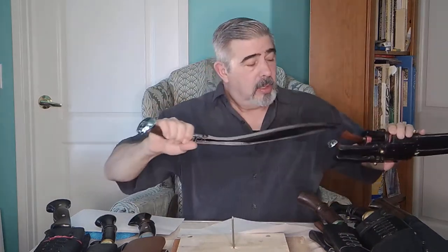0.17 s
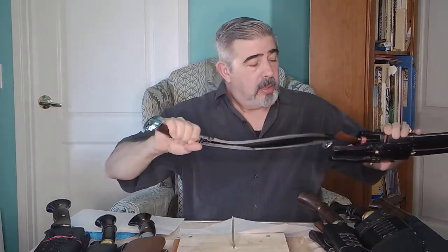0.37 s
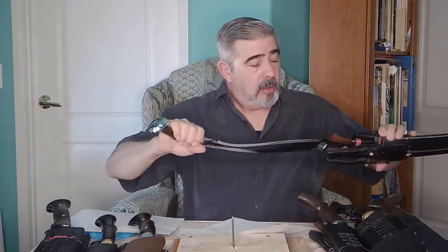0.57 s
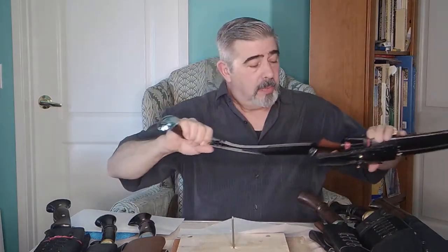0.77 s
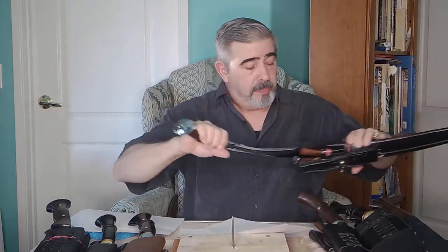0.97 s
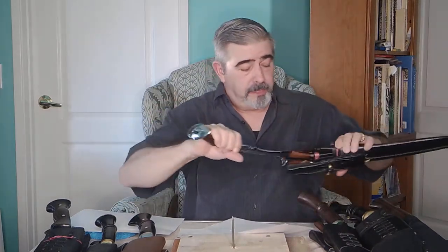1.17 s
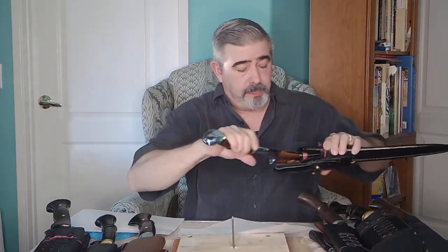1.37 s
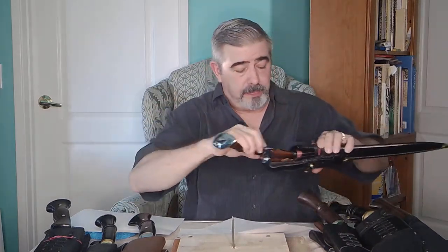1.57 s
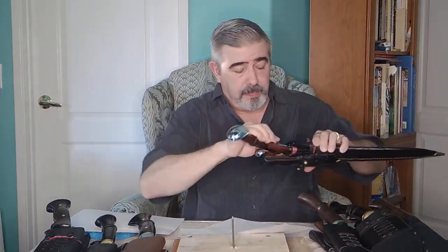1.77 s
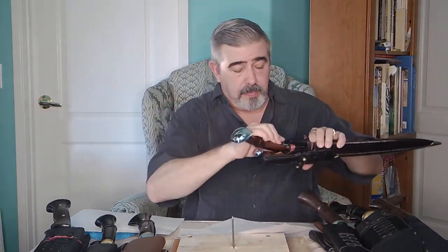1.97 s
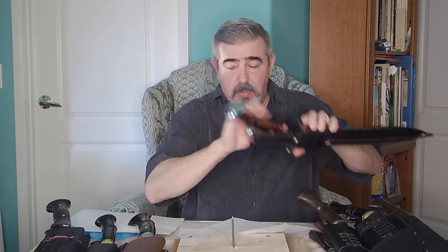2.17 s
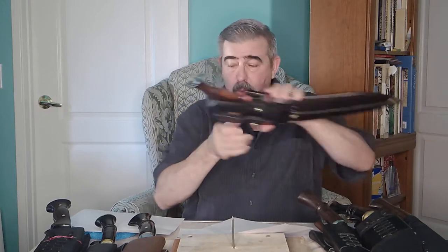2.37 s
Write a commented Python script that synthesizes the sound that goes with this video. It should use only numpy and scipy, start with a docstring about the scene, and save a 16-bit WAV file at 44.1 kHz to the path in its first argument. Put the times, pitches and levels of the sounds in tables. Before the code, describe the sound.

A blade taps and rubs into a stiff sheath, then clacks home twice indoors.

```python
"""A long curved knife is fed into its stiff scabbard in a small, lively room.
The tip taps the mouth a few times, the blade rubs along the lining in tiny slips, then knocks home
in two loud clacks that ring the sheath. A last tick and a short scrape follow as it is lifted.
A steady hiss lies underneath; the microphone favours 1-3 kHz and has two dips in the treble."""
import sys
import numpy as np
from scipy import signal
from scipy.fft import rfft, irfft, next_fast_len
from scipy.io import wavfile
from scipy.ndimage import uniform_filter1d, minimum_filter1d

SR = 44100
rng = np.random.default_rng(int(sys.argv[2]) if len(sys.argv) > 2 else 0)


def digitize_waveform(pressure):
    """Quantize a signal to 16-bit integers and store it at the path in sys.argv[1].

    Rows of a 2-D input are taken as channels; values are limited to [-1, 1].
    """
    field = np.atleast_2d(pressure).T
    bounded = np.clip(field, -1, 1)
    quanta = np.round(bounded * 32767).astype(np.int16)
    wavfile.write(sys.argv[1], SR, quanta)


N = 106986

# The EQ all knocks share. Each row: frequency in Hz, gain in dB.
KNOCK_EQ = [(60, -55), (170, -27), (330, -26.5), (500, -16.5), (760, -15), (920, -4.5), (1080, -6.5),
            (1400, 1), (1850, -1), (2250, -0.5), (2850, -3), (3400, -9), (4000, -21), (4800, -26.5),
            (5500, -32.5), (7200, -36.5), (9000, -44.5), (13000, -64), (15500, -77)]
# The blade hitting the scabbard. Each row: start in seconds, level in dB before the limiter, crunch
# length in seconds, then thud, body, edge and sparkle EQ in dB, then sheath ring trim, room send and
# steel snap in dB, and last the hollow note of the struck spot in Hz.
BLADE_HITS = [ (0.5256, -45.5, 0.0049, -6, 2, -8, -1, -5.5, 4, -58, 1400),
              (0.531, -46.5, 0.0023, 4, 4, 15, 10, -11, 4, -46, 1610),
              (0.725, -38, 0.0061, 6, 2, -4.5, 1, -4.5, 0.5, -52, 1630),
              (0.7495, -46, 0.0025, 13.5, 14.5, 5, 19, -11, -0.5, -38, 1570),
              (0.8826, -37.5, 0.0032, 2, 2.5, -8, -8, -0.5, 0.5, -52, 1360),
              (1.0082, -35, 0.0032, 13, 7, 4, 12, -4.5, 2.5, -47, 2460),
              (1.446, -38.5, 0.0022, 5, 0.5, 11, 19, -4, 0.5, -39, 2180),
              (1.5969, -17.5, 0.0061, -12, 0.5, -2, 6, 4.5, 3.5, -37.5, 908),
              (1.8416, -46.5, 0.00088, -7, -12.5, 14, 15, -12, -20, -38, 3110),
              (1.8486, -39, 0.0054, -5, 1.5, 1, 7, -6, 3.5, -50, 1450),
              (1.9023, -26, 0.0065, 1.5, 1, 2, 3.5, -11, 0.5, -50, 2790),
              (1.9113, -25.5, 0.0073, -1.5, -4.5, -3.5, -10, -9.5, -2.5, -58, 1424),
              (2.089, -54.5, 0.0022, -4, -2, 2, 5, -12, 2, -39, 3140),
              (2.2977, -47.5, 0.0026, -13, -8, 14, 5, -23, -9, -41, 3070)]


def blade_knocks():
    """Each hit is a snap of steel and a few milliseconds of hollow crunch; sheath and room ring on."""
    out, t = np.zeros(N + SR), np.arange(SR // 2) / SR
    attack_s, level_window_s = 0.0002, .03
    sheath_db, steel_room_db = -5, -3
    hollow_db, hollow_octaves = 6, 0.13
    for start_s, db, crunch_s, thud, body, edge, sparkle, ring_db, room_db, snap_db, hz in BLADE_HITS:
        envelope = (1 - np.exp(-t / attack_s)) * np.exp(-(t / crunch_s) ** 2)
        crunch = evened(rng.standard_normal(len(t)) * envelope, bins=400)
        walls = room(t)
        reverb = evened(signal.fftconvolve(crunch, walls)[:len(t)], bins=150)
        tone = [(213.8, thud), (710, body), (1750, 0), (5400, edge), (10800, sparkle)]
        hollow = [(hz / 2 ** hollow_octaves, 0), (hz, hollow_db), (hz * 2 ** hollow_octaves, 0)]
        clack = unit(coloured(crunch + from_db(room_db) * reverb, KNOCK_EQ, tone, hollow))
        ring = from_db(sheath_db + ring_db) * sheath_ring(t, tone)
        snap = from_db(snap_db) * steel_snap(t)
        snap_reverb = from_db(steel_room_db) * signal.fftconvolve(snap, walls)[:len(t)]
        hit = unit(clack + ring) + snap + snap_reverb
        start = int(start_s * SR)
        out[start:start + len(t)] += from_db(db) * hit / np.std(hit[:int(level_window_s * SR)])
    return out[:N]


# The sheath's modes with the blade inside. Each row: pitch in Hz, level in dB before EQ, T60 in seconds.
SHEATH_MODES = [(470, -4, .15), (770, -7, .15), (926, -1.5, .23), (1255, 0, .26), (1295, -6, .27),
                (1374, -4, .25), (1632, -5, .31), (1811, -4, .23), (1885, -7, .22), (2069, -5, .33),
                (2093, -3, .28), (2212, -4.5, .27), (2464, -10, .29), (2524, -8, .24), (2623, -4, .31),
                (3420, -2, .25)]


def sheath_ring(t, tone):
    """The stiff sheath rings on in the midrange, coloured like the knock that set it off."""
    return unit(coloured(struck(SHEATH_MODES, t), KNOCK_EQ, tone))


# The blade's modes. Each row: pitch in Hz, relative level in dB, T60 in seconds.
STEEL_MODES = [(7150, -1, .008), (9000, -5, .004), (11100, -1, .007), (12650, -10, .012), (13200, -6, .012),
               (14700, -11, .005)]


def steel_snap(t):
    """The struck steel rings so high and so briefly that it lands as a bright snap."""
    return struck(STEEL_MODES, t)


# Fader ride for the pressure of the sliding blade. Each row: time in seconds, level in dB.
RUB_FADER = [(.5, -69), (.6, -65), (.85, -59.5), (1.0, -59), (1.08, -57), (1.12, -47), (1.175, -52),
             (1.225, -46.5), (1.28, -54), (1.41, -53.5), (1.55, -57), (1.8, -55), (2.04, -58.5),
             (2.12, -55), (2.26, -62.5), (2.33, -50.5), (2.42, -58.5)]
# The colour of steel on the lining. Each row: frequency in Hz, gain in dB.
RUB_EQ = [(150, -19.5), (700, -18), (1100, -9.5), (1310, -1), (1600, -3.5), (2150, 1.5), (2900, -3),
          (3700, -14), (4700, -15.5), (5500, -25.5), (7200, -20), (10000, -30.5), (15000, -48)]


def blade_rub():
    """The sliding steel catches on the lining in countless tiny slips that come in small swells."""
    t = np.arange(N) / SR
    slips_per_s, spread_db = 3000, 5.5
    swell_points_per_s, swell_db, room_db = 42, 2.5, 3.5
    swell = np.interp(t * swell_points_per_s, np.arange(N), rng.standard_normal(N))
    slip_db = spread_db * np.minimum(rng.exponential(1, N), 3) + swell_db * swell
    slips = from_db(slip_db) * rng.choice([-1, 1], N)
    slipping = rng.random(N) < slips_per_s / SR
    rub = coloured(slips * slipping, RUB_EQ)
    rub = rub + from_db(room_db) * signal.fftconvolve(rub, room(t[:SR // 2]))[:N]
    fader = from_db(np.interp(t, *np.transpose(RUB_FADER)))
    return fader * rub / np.std(rub)


# The scrape as the sheath is lifted. Each row: time in seconds, level in dB, resonance in Hz.
SCRAPE_PATH = [(2.3, -67, 3000), (2.315, -51.5, 3160), (2.335, -57.5, 3540), (2.361, -62, 3845),
               (2.385, -61, 3670), (2.425, -75, 3580)]


def lift_scrape():
    """A brief rasp whose narrow resonance, with a faint octave above, rises as it speeds up."""
    t = np.arange(N) / SR
    times, db, hz = np.transpose(SCRAPE_PATH)
    width_hz, octave_db = 690, -19
    grain = lowpassed(rng.standard_normal((3, N)), width_hz / 2, order=2)
    phase = 2 * np.pi * np.cumsum(np.interp(t, times, hz)) / SR
    octave = from_db(octave_db) * grain[2] * np.cos(2 * phase)
    rasp = grain[0] * np.cos(phase) + grain[1] * np.sin(phase) + octave
    return np.interp(t, times, from_db(db), left=0) * rasp / np.std(rasp)


# Early reflections off desk and walls. Each row: delay in seconds, level in dB before the treble cut.
REFLECTIONS = [(.0105, -11), (.017, -9.5), (.025, -16), (.035, -17.5), (.051, -13.5)]


def room(t):
    """The room's impulse response: a few dull reflections in a dense tail whose treble dies sooner."""
    low_t60_s, treble_t60_s, onset_s = 0.3, 0.22, 0.0055
    noise = rng.standard_normal(len(t))
    low = lowpassed(noise, hz=10300, order=1)
    tail = low * from_db(-60 * t / low_t60_s) + (noise - low) * from_db(-60 * t / treble_t60_s)
    fade_in = 1 - np.exp(-(t / onset_s) ** 2)
    early = np.zeros(len(t))
    for delay_s, db in REFLECTIONS:
        early[int(delay_s * SR)] += from_db(db)
    return lowpassed(early, hz=3500, order=2) + unit(tail * fade_in)


# The colour of the noise floor. Each row: frequency in Hz, gain in dB.
HISS_EQ = [(25, -1.5), (45, -12.5), (62, -3.5), (100, -8.5), (250, -9), (500, -10), (800, -8.5),
           (1120, -6.5), (1320, 1), (1480, -0.5), (1750, -2.5), (1950, 0.5), (2110, 2), (2400, -6),
           (2950, -2), (3600, -13), (4500, -20), (5300, -26), (7200, -39), (9000, -37), (11000, -29.5),
           (13000, -32.5), (15500, -35)]


def hiss(level_db=-52.5):
    """An even bed of noise from the room and the microphone."""
    bed = coloured(rng.standard_normal(N + SR // 2), HISS_EQ)[-N:]
    return from_db(level_db) * bed / np.std(bed)


def struck(modes, t):
    """A body's modes as decaying sines, struck a little differently every time."""
    hz, db, t60 = np.array(modes).T[:, :, None]
    strength = from_db(db + rng.normal(0, 0.24, hz.shape)) * rng.choice([-1, 1], hz.shape)
    return unit(np.sum(strength * np.sin(2 * np.pi * hz * t) * from_db(-60 * t / t60), axis=0))


def coloured(x, *curves):
    """Minimum-phase EQ that follows the sum of some (Hz, dB) curves."""
    size = 2 * next_fast_len(len(x) // 2 + 2048)
    log_hz = np.log(np.arange(size // 2 + 1) * SR / size + 1)
    db = sum(np.interp(log_hz, np.log(hz), gain) for hz, gain in map(np.transpose, curves))
    cepstrum = irfft(np.log(from_db(db)))
    cepstrum[1:size // 2] *= 2   # folded forward, so nothing rings ahead of an attack
    cepstrum[size // 2 + 1:] = 0
    return irfft(rfft(x, size) * np.exp(rfft(cepstrum)))[:len(x)]


def evened(x, bins):
    """Level out the chance colour of a burst over so many frequency bins; energy 1."""
    spectrum = rfft(x, 2 * len(x))
    power = np.maximum(uniform_filter1d(np.abs(spectrum) ** 2, bins), 1e-12)
    return unit(irfft(spectrum / np.sqrt(power))[:len(x)])


def lowpassed(x, hz, order):
    """Roll off the highs."""
    return signal.sosfilt(signal.butter(order, hz, fs=SR, output="sos"), x)


def from_db(db):
    """Decibels to gain."""
    return 10 ** (np.asarray(db) / 20)


def unit(x):
    """Scale to energy 1."""
    return x / np.sqrt(np.sum(x ** 2) + 1e-20)


def scene():
    """Knocks, rubbing and a last scrape over the hiss, in mono."""
    return (blade_knocks() + blade_rub() + lift_scrape() + hiss())[None]


# The microphone's treble dips. Each row: centre in Hz, width in Hz.
MIC_NOTCHES = [(6000, 2560), (8000, 1350)]


def record(dry):
    """A quick limiter holds the loudest peaks, two notches scoop the treble, then the top is cut."""
    ceiling, hold_s, notch_mix, cutoff_hz = .42, .003, .93, 15700
    hold = int(hold_s * SR)
    gain = minimum_filter1d(ceiling / np.maximum(np.abs(dry), ceiling), hold)
    mix = dry * uniform_filter1d(gain, hold)
    for hz, width_hz in MIC_NOTCHES:
        notched = signal.lfilter(*signal.iirnotch(hz, hz / width_hz, fs=SR), mix)
        mix = (1 - notch_mix) * mix + notch_mix * notched
    return signal.sosfilt(signal.ellip(10, .1, 70, cutoff_hz, fs=SR, output="sos"), mix)


dry = scene()
out = record(dry)
digitize_waveform(out)
```